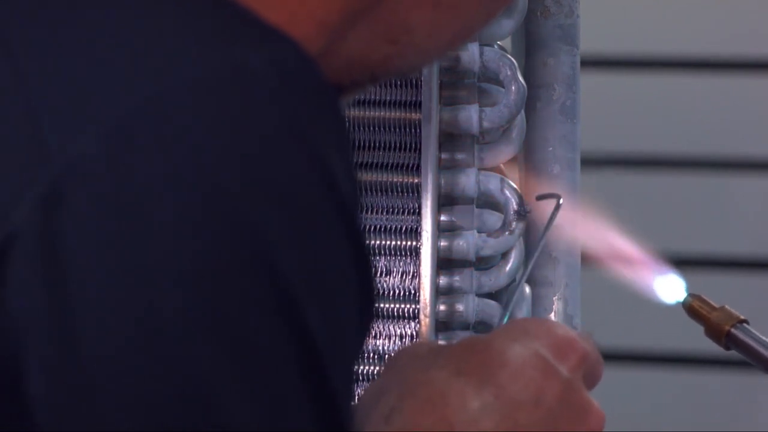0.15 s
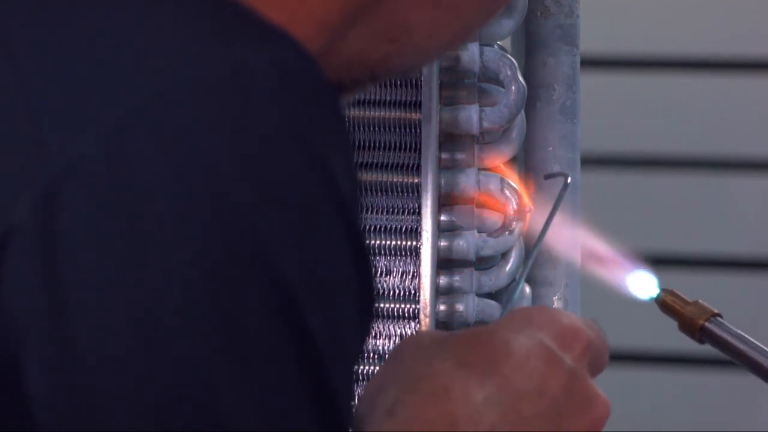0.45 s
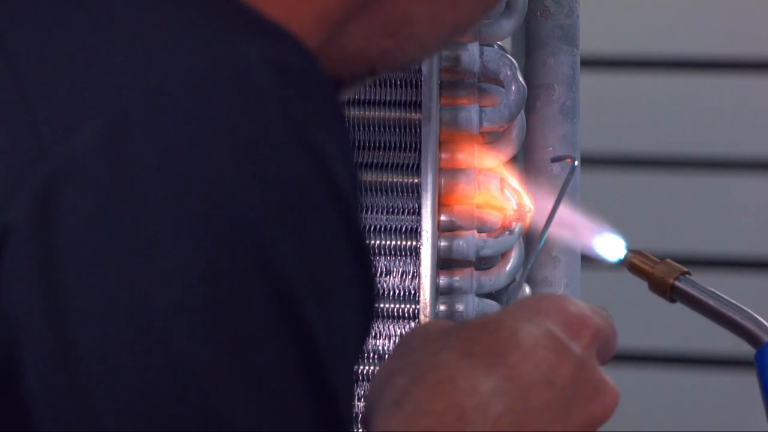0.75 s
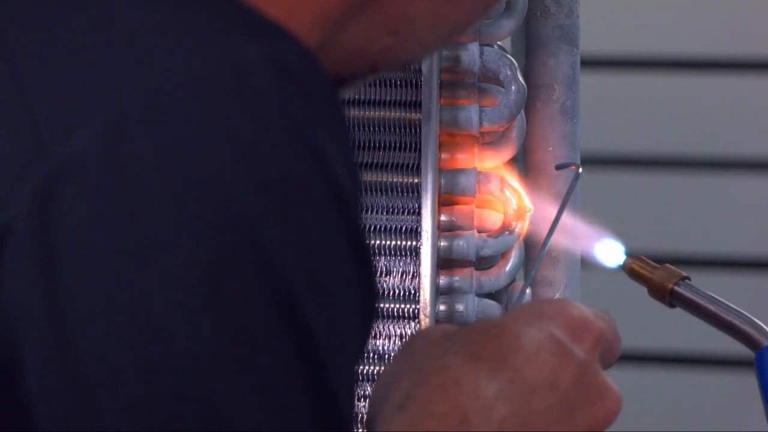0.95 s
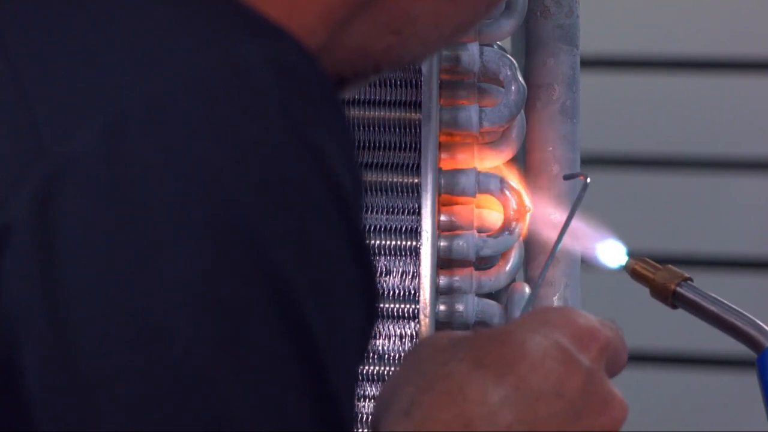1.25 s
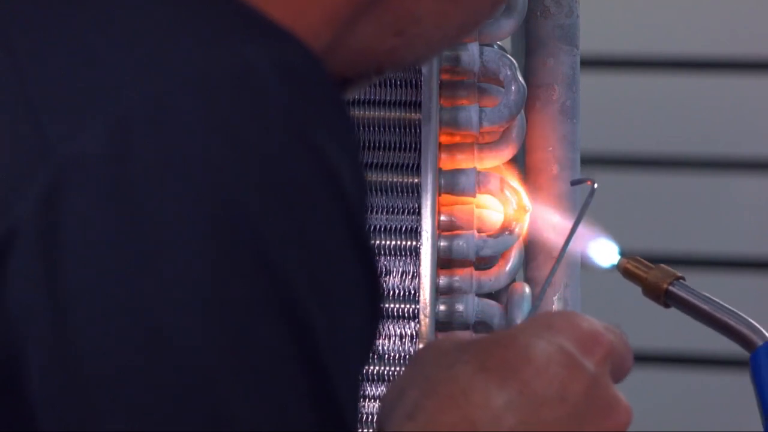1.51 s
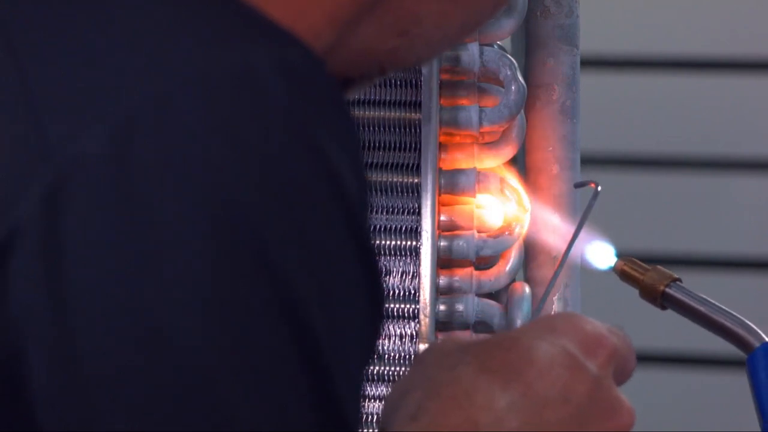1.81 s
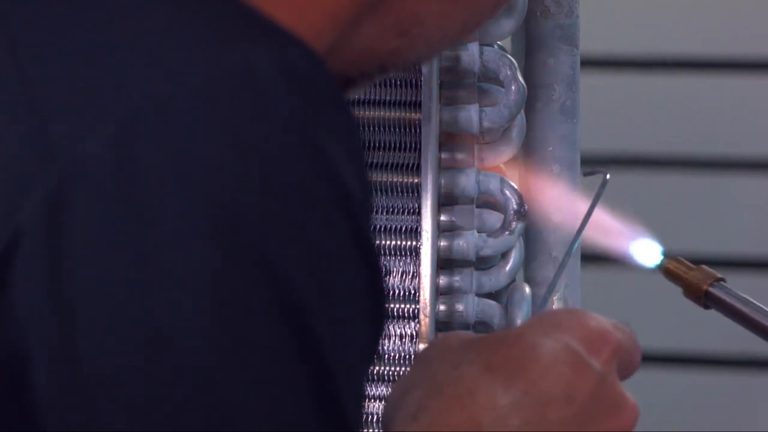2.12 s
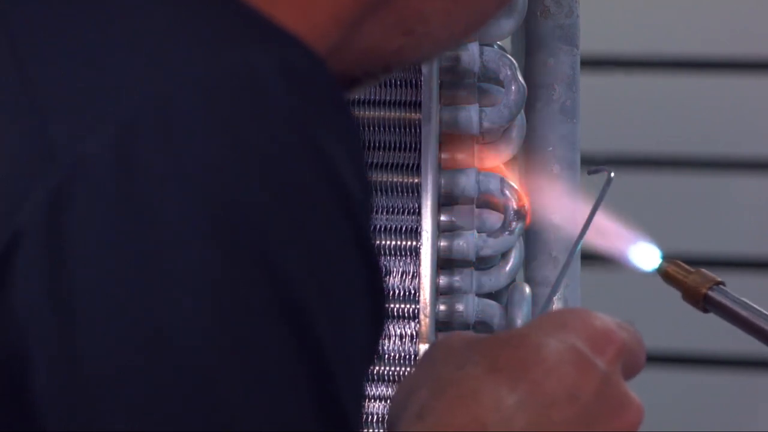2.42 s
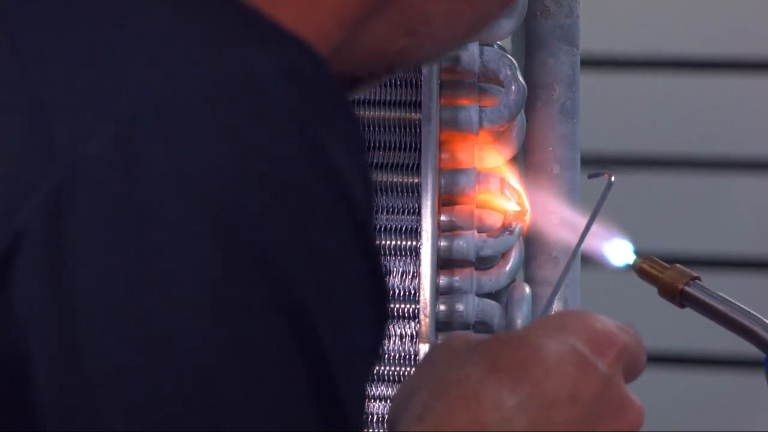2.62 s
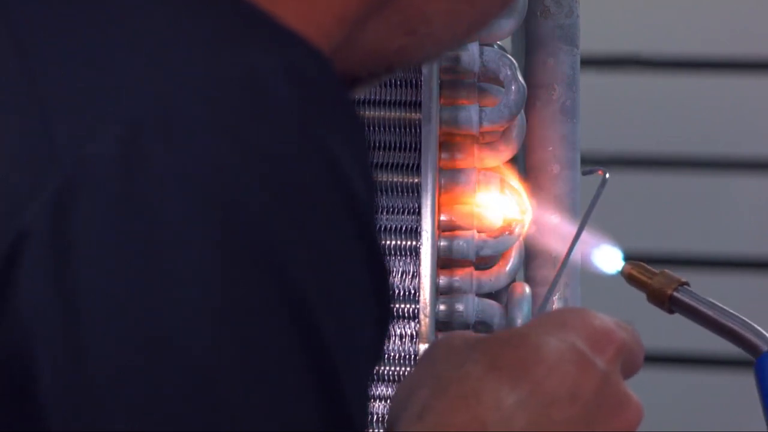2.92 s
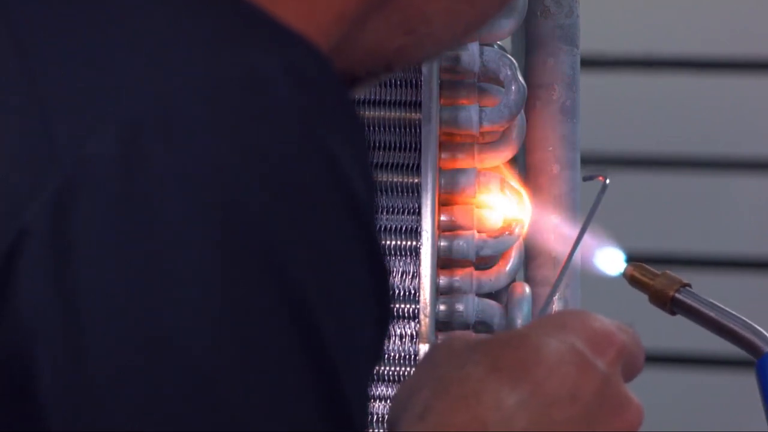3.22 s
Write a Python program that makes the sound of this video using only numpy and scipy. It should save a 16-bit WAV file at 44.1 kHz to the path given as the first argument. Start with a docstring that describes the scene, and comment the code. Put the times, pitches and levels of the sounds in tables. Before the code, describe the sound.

Close up in a small hard-walled workshop, a torch nozzle whistles high and unsteadily, faltering now and then, while gas hisses and the flame rushes softly over metal, changing tint as the torch moves.

```python
"""A gas torch burns steadily against copper pipe bends in a workshop.
Its nozzle sings a thin, fluttering whistle that falters now and then: a sine of unsteady pitch and size.
The nozzle also hisses, the flame roars softly on the metal and the treble sizzles: all are coloured noise.
Hiss and sizzle change colour as the hand draws the torch back and brings it close.
Under this lies a faint low flutter, and nearby walls add a short ring to the flame."""
import sys
import numpy as np
from scipy import signal
from scipy.fft import rfft, irfft
from scipy.io import wavfile

SR = 44100
rng = np.random.default_rng(int(sys.argv[2]) if len(sys.argv) > 2 else 0)


def materialize(psi):
    """Save the field psi as 16-bit PCM at rate SR to the path in sys.argv[1].

    A 1-D psi becomes a single channel; in a 2-D psi each row is a channel.
    """
    bounded = np.clip(np.atleast_2d(psi).T, -1, 1)
    quanta = np.round(bounded * 32767).astype(np.int16)
    wavfile.write(sys.argv[1], SR, quanta)


N = 147735
T = np.arange(N) / SR  # time of each sample, s


def undb(db):
    """Turn decibels into a plain factor."""
    return 10 ** (np.asarray(db) / 20)


def unit(x):
    """Scale a signal so that its spread (rms) is 1."""
    return x / np.std(x)


def curve(table, axis=1):
    """Join one column of a table by straight lines in time."""
    rows = np.array(table)
    return np.interp(T, rows[:, 0], rows[:, axis])


def filtered(gain):
    """Colour noise by the given gain at each frequency, then scale it to rms 1."""
    frequency = np.maximum(np.fft.rfftfreq(N, 1 / SR), 1)
    spectrum = rfft(rng.standard_normal(N)) * gain(frequency)
    return unit(irfft(spectrum, N))


def walk(rate):
    """Wander smoothly at random: about `rate` new values a second, rms 1."""
    return filtered(lambda f: 1 / (1 + (2 * f / rate) ** 4) ** .5)


# moments when the whistle falters: t/s, length/s (width at half the depth), depth/dB
FALTER_MOMENTS = [(0.376, 0.027, 7), (.672, 0.053, 4), (1.055, 0.028, 7), (1.136, 0.014, 9),
                  (1.468, .03, 3), (1.753, 0.048, 5.5), (2.267, 0.026, 11), (2.311, 0.036, 7.5),
                  (2.392, 0.04, 17), (2.618, 0.011, 9), (2.843, 0.028, 12), (2.956, .036, 8),
                  (3.331, 0.022, 15)]


def faltering():
    """Add up the decibels lost in the moments when the jet drops out of its tone."""
    lost = np.zeros(N)
    for at, length, depth in FALTER_MOMENTS:
        lost += depth * .5 ** ((2 * (T - at) / length) ** 4)
    return lost


# middle pitch of the nozzle whistle: t/s, f/Hz
WHISTLE_PITCH = [(0, 5017), (.33, 5015), (.37, 4980), (.41, 5032), (.75, 5008), (.82, 5038), (1.25, 5060),
                 (1.75, 5040), (2.0, 5034), (2.37, 5034), (2.45, 5014), (2.58, 5035), (3.35, 5034)]
# strength of the whistle before it sways and falters: t/s, level/dB, flutter/share of its size
WHISTLE_STRENGTH = [(0, -18.5, .22), (.6, -16.5, 0.3), (.92, -16.5, 0.37), (1.2, -18, .31),
                    (1.76, -18.5, 0.34), (1.88, -15.5, 0.16), (2.2, -16, 0.2), (2.45, -18.5, .27),
                    (2.6, -16.5, .22), (2.8, -18.5, 0.34), (3.02, -16, 0.19), (3.35, -16, .17)]
WAVER_HZ, WAVER_RATE = 4.67, 32  # slow pitch unsteadiness: rms in Hz, rate per s
JITTER_HZ, JITTER_RATE = 9.8, 344  # quick pitch unsteadiness: rms in Hz, rate per s
FLUTTER_RATE = 220  # quick unsteadiness of size, per s
SWAY_DB, SWAY_RATE = 1.4, 41  # slow unsteadiness of size before limiting: rms in dB, rate per s
SATURATION = 0.83  # how hard the swing in size is limited
EDGE_HZ, EDGE_WIDTH_HZ, EDGE_DB = 5085, 33, -30.5  # breathy band: middle, width, level before falters


def whistle(lost):
    """The nozzle's tone, shaken by the jet and limited in its swing, with a breathy edge."""
    waver = WAVER_HZ * walk(WAVER_RATE)
    jitter = JITTER_HZ * walk(JITTER_RATE)
    pitch = curve(WHISTLE_PITCH) + waver + jitter
    flutter = np.abs(1 + curve(WHISTLE_STRENGTH, axis=2) * walk(FLUTTER_RATE))
    drive = flutter * undb(SWAY_DB * walk(SWAY_RATE))
    limited = np.tanh(SATURATION * drive) / np.tanh(SATURATION)
    size = limited * undb(curve(WHISTLE_STRENGTH) - lost)
    phase = 2 * np.pi * np.cumsum(pitch) / SR
    tone = np.sqrt(2) * size * np.sin(phase)  # a sine of height sqrt(2) has rms 1
    edge = filtered(lambda f: 1 / np.hypot(1, 2 * (f - EDGE_HZ) / EDGE_WIDTH_HZ))
    return tone + edge * undb(EDGE_DB - lost / 2)  # the edge falters half as deep


# levels of the flame before trims: t/s, roar level/dB, nozzle hiss level/dB, treble sizzle level/dB
FLAME_LEVELS = [(0, -29.5, -21, -26.5), (.55, -28.5, -22, -27.5), (.7, -29.5, -23.5, -27.5),
                (1.05, -30, -23, -27), (1.3, -27.5, -22, -25), (1.65, -29.5, -22, -26.5),
                (1.77, -31.7, -22.5, -27.5), (2.05, -31, -24.5, -26.5), (2.35, -30, -21.5, -26.5),
                (2.52, -28.7, -21.5, -26.5), (2.8, -29.5, -22, -27), (3.1, -30, -23, -27.5),
                (3.35, -31.5, -22.5, -27.5)]
ROAR_DB, HISS_DB, SIZZLE_DB = 1.12, 2.35, 0.27  # trims added to the levels
HISS_FALTER = 0.24  # share of a falter's decibels that reaches the hiss
GUST_DB, GUST_RATE = 0.23, 25  # shared trembling of the flame: rms in dB, rate per s


def flame(lost):
    """Hiss, sizzle and roar swell together; hiss and sizzle sag when the whistle falters."""
    hissing = hiss() * undb(curve(FLAME_LEVELS, axis=2) + HISS_DB - HISS_FALTER * lost)
    sizzling = sizzle() * undb(curve(FLAME_LEVELS, axis=3) + SIZZLE_DB - HISS_FALTER * lost / 2)
    roaring = roar() * undb(curve(FLAME_LEVELS) + ROAR_DB)
    gusts = undb(GUST_DB * walk(GUST_RATE))
    return (hissing + sizzling + roaring) * gusts


# colour of the hiss with the torch close to the pipes: f/Hz, relative level/dB per Hz
CLOSE_HISS = [(2500, -45), (3620, -43), (3830, 0), (4100, -7), (4450, -.5), (4800, -1.5), (5150, 3.5),
              (5550, -3.5), (5880, 1.5), (6250, -4.5), (6500, 1.5), (6880, -14), (8500, -33)]
# colour of the hiss from the freer jet, torch drawn back: f/Hz, relative level/dB per Hz
BACK_HISS = [(2500, -52), (3700, -14.5), (4450, -5.5), (4750, 1.5), (5050, -0.5), (5250, -4), (5450, 5),
             (5750, -7), (6180, 1.5), (6480, -9), (6900, -20), (8500, -40)]


def hiss():
    """Gas rushing from the nozzle: noise mostly between 3.5 and 7 kHz."""
    return aimed(CLOSE_HISS, BACK_HISS)


# colour of the sizzle with the torch close to the pipes: f/Hz, relative level/dB per Hz
CLOSE_SIZZLE = [(4000, -22), (6800, -3.5), (7080, 5.5), (7600, 1), (7830, -8), (8080, 6), (8650, -2),
                (8930, 5.5), (9300, -3), (9700, 0.5), (10150, -0.5), (10650, -9.5), (10880, -6.5),
                (12500, -16), (14000, -10.5), (15500, -12)]
# colour of the sizzle from the freer jet, torch drawn back: f/Hz, relative level/dB per Hz
BACK_SIZZLE = [(4000, -28), (6600, -1), (7000, 1), (7450, -7), (7750, 2.5), (8020, 3.5), (8270, -7),
               (8650, 1.5), (8930, -3), (9350, -2), (10050, -1.5), (10300, -7), (11500, -13),
               (12350, -10.5), (12700, -11.5), (15500, -13.5)]


def sizzle():
    """The treble of the jet: noise mostly above 6 kHz."""
    return aimed(CLOSE_SIZZLE, BACK_SIZZLE)


# colour of the flame's roar on the metal: f/Hz, relative level/dB per Hz
ROAR_COLOUR = [(150, -24.5), (320, -12), (390, -6), (440, -6.5), (525, 0.5), (820, -2.5), (945, 0),
               (1025, -5), (1120, -0.5), (1360, 1), (1510, -8), (1870, -1.5), (2100, -3.5), (2650, 1),
               (3020, -9), (3500, -1.5), (5000, -18), (9000, -51)]


def roar():
    """The flame rushing over the metal: noise mostly between 300 Hz and 4 kHz."""
    return rush(ROAR_COLOUR)


# how far the torch is drawn back from the pipes: t/s, distance/share (0 close, 1 back)
TORCH_DISTANCE = [(0, 1), (.58, 0.93), (.82, 0.056), (2.22, 0), (2.4, 0.95), (2.66, 1), (2.82, 0.042),
                  (3.35, 0.23)]


def aimed(close, free):
    """Blend two colours of gas noise as the torch moves between the pipes and free air."""
    back = np.clip(curve(TORCH_DISTANCE), 0, 1)
    # square roots keep the power steady through the blend
    return np.sqrt(1 - back) * rush(close) + np.sqrt(back) * rush(free)


def rush(spectrum):
    """Turbulent gas: noise of a given colour, its level trembling."""
    hz, db = np.array(spectrum).T
    noise = filtered(lambda f: undb(np.interp(np.log(f), np.log(hz), db)))
    return noise * undb(trembling())


TURBULENCE_DB, TURBULENCE_RATE = 0.6, 44  # rms in dB, rate per s


def trembling():
    """Small random ups and downs in decibels from turbulence, drawn afresh for each layer."""
    return TURBULENCE_DB * walk(TURBULENCE_RATE)


RUMBLE_HZ, RUMBLE_DB = 270, -48.5  # upper edge, middle level


def rumble():
    """The flame's faint low flutter: noise that fades above its upper edge."""
    low_noise = filtered(lambda f: 1 / np.hypot(1, (f / RUMBLE_HZ) ** 2))
    return low_noise * undb(RUMBLE_DB + trembling())


ROOM_T60_S, ROOM_DB = .2, -7.5  # time for the ring to fall by 60 dB; ring against direct sound


def workshop(x):
    """Dense, short reflections from the walls around: the sound smeared by fading noise."""
    tail = rng.standard_normal(N) * undb(-60 * T / ROOM_T60_S)
    tail = tail / np.linalg.norm(tail)
    wet = irfft(rfft(x) * rfft(tail), N)
    return (x + undb(ROOM_DB) * wet) / np.hypot(1, undb(ROOM_DB))


WHISTLE_PAN_DB = 1.1  # how much louder the whistle is on the left than on the right


def scene():
    """The whistle a touch to the left, the flame and its rumble in the middle."""
    lost = faltering()
    left_right = undb(np.array([[WHISTLE_PAN_DB], [-WHISTLE_PAN_DB]]) / 2)
    return whistle(lost) * left_right + workshop(flame(lost)) + rumble()


TOP_HZ = 15750  # highest frequency let through


def record(dry):
    """Cut the top steeply with a low-pass filter."""
    # 12th order, 0.1 dB ripple below the edge, 90 dB down above it
    low_pass = signal.ellip(12, .1, 90, TOP_HZ, fs=SR, output="sos")
    return signal.sosfilt(low_pass, dry)


dry = scene()
out = record(dry)
materialize(out)
```